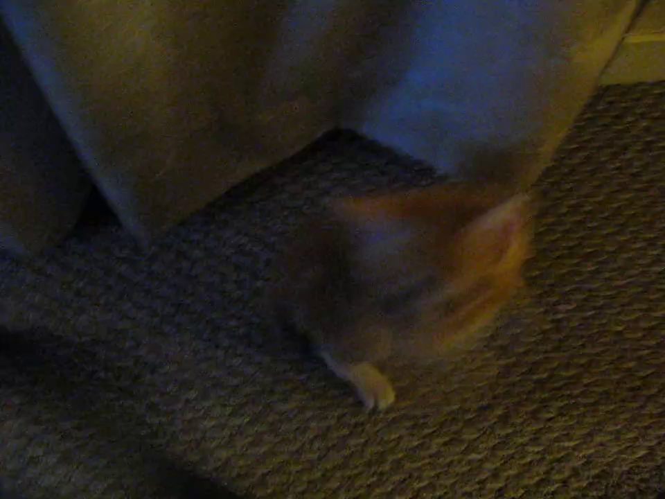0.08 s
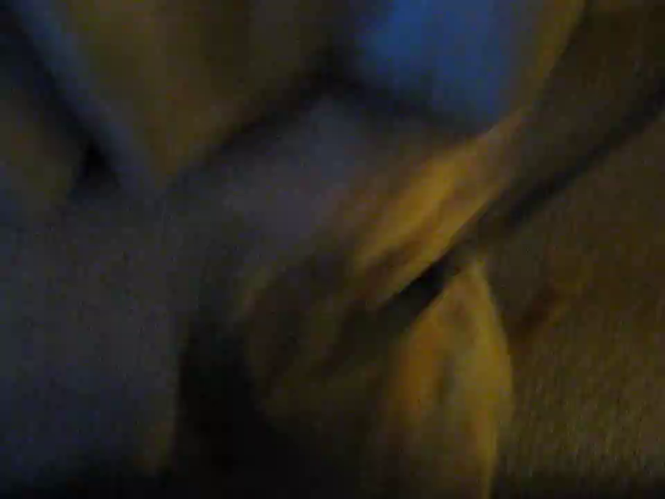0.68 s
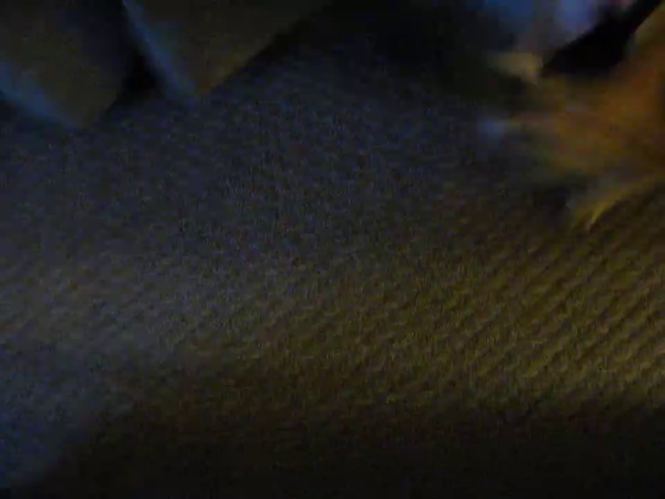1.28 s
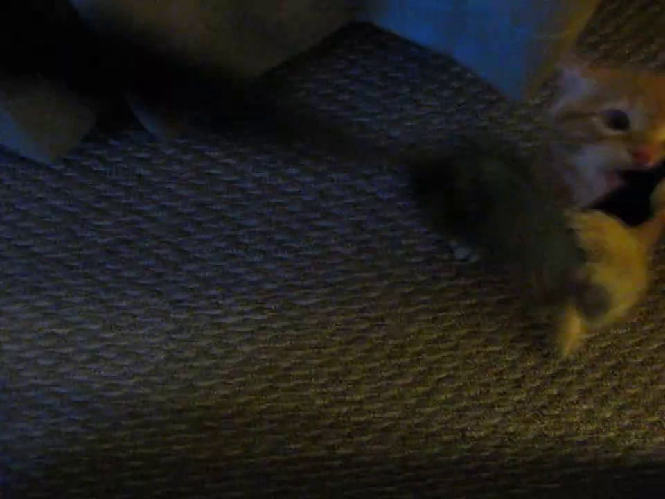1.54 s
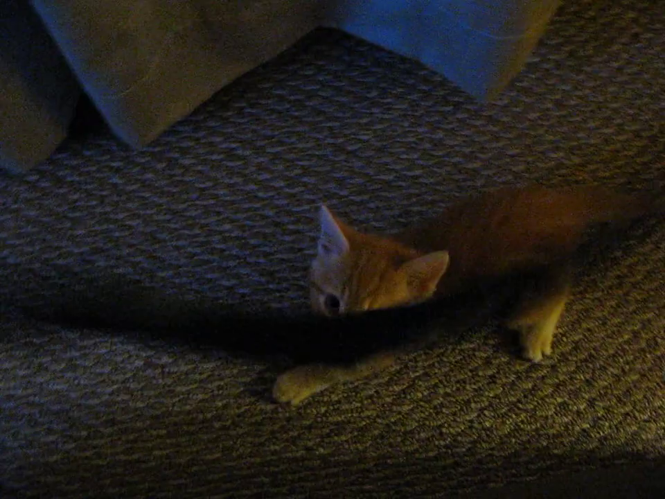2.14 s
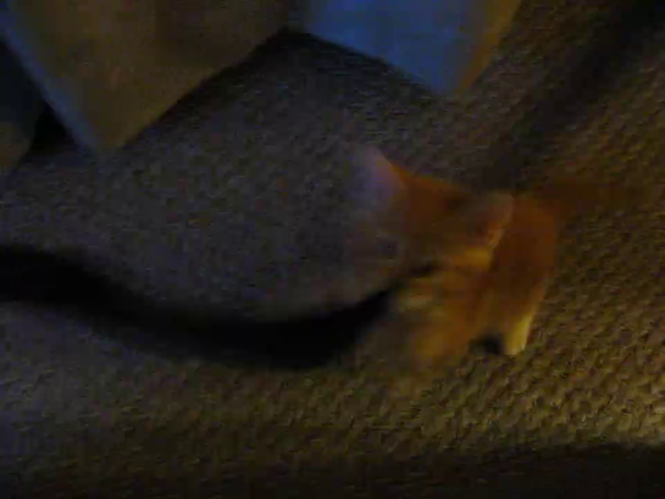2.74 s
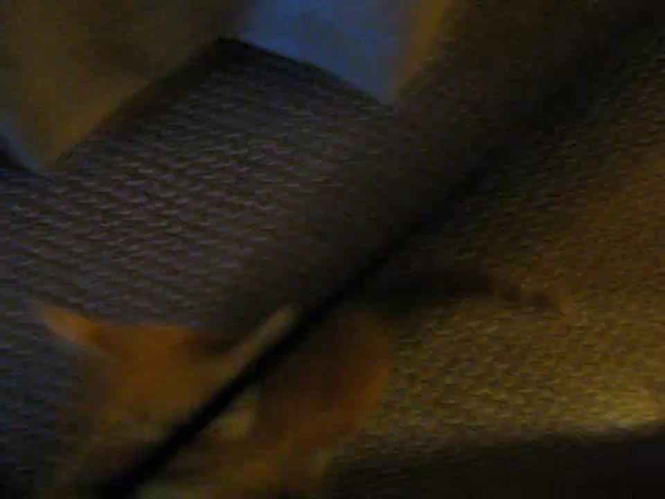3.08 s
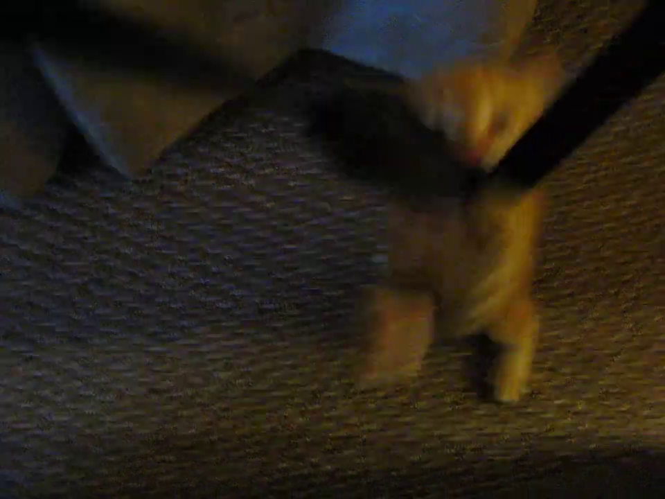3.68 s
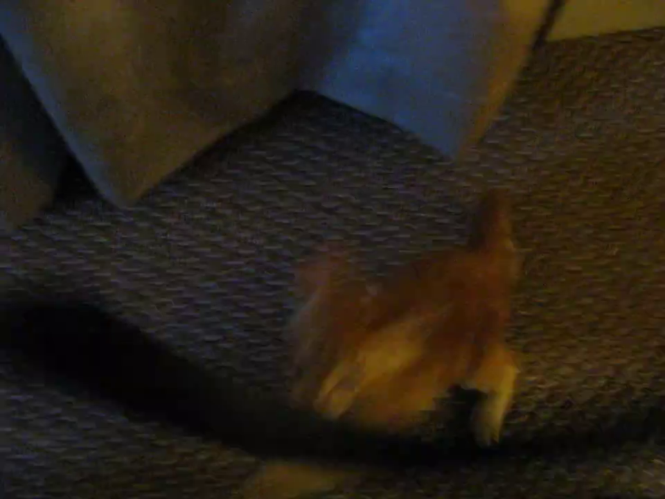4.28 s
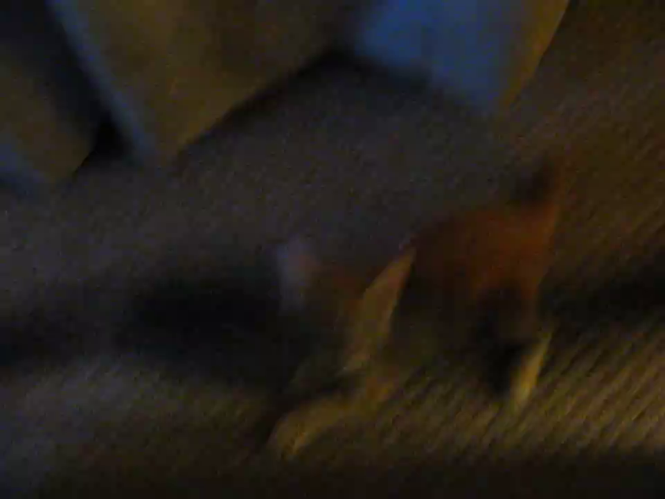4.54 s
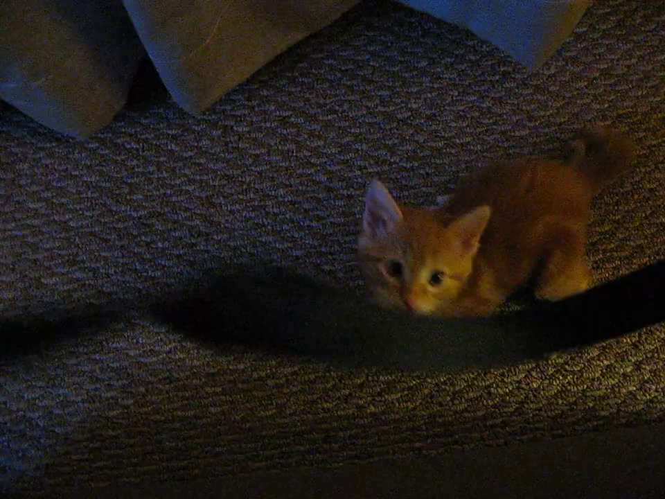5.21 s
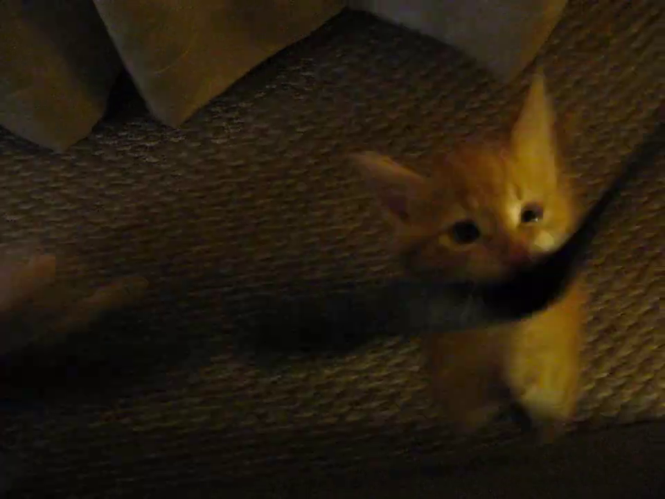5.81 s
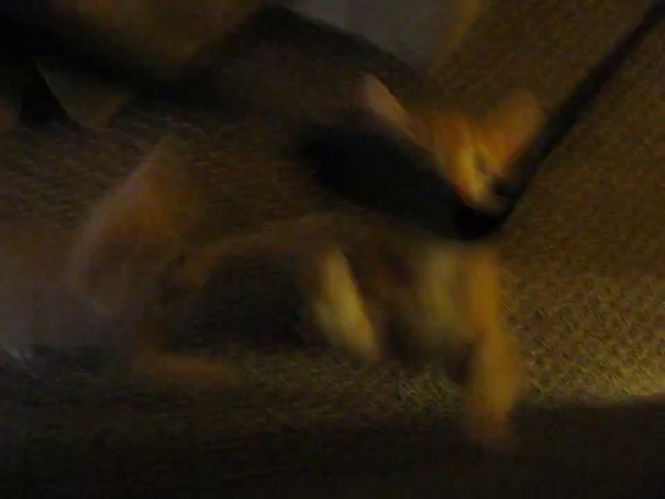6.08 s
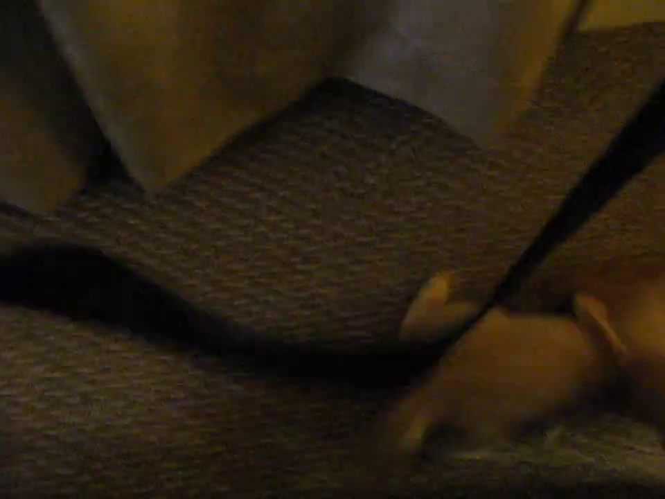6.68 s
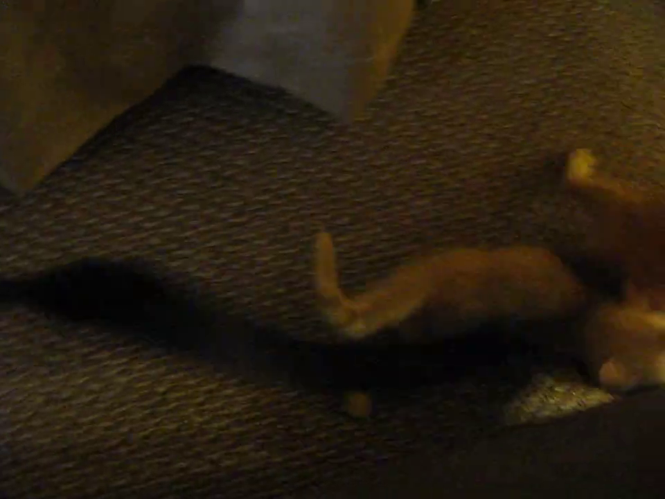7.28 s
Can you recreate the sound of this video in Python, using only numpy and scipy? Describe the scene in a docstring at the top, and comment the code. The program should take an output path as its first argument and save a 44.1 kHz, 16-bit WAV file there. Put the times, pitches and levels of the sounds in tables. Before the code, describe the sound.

A dangling strap clicks and scrapes against a camera as kitten paws thud on carpet in a quiet room.

```python
"""A faint hush and the thin hiss of a camera's focus drive, then the ticks and rubs of its dangling strap.
Kittens are pouncing on the strap in a quiet carpeted room. The fittings strike the camera's shell,
tugs jolt it, and the webbing rasps, swishes and squeaks by friction. Each landing excites the modes
of the wooden floor under the carpet, which knocks and booms. Close to the microphone,
a lens motor whirrs faintly in brief moves."""
import sys
import numpy as np
from scipy import signal
from scipy.fft import rfft, irfft
from scipy.io import wavfile

SR = 44100
rng = np.random.default_rng(int(sys.argv[2]) if len(sys.argv) > 2 else 0)


def transcribe(u):
    """Save the signal u as a 16-bit wav file named by the first command-line argument.

    u: samples, shape (n,) or (channels, n), limited to [-1, 1]; the rate is SR.
    q: integer samples, one column per channel.
    """
    v = np.clip(np.atleast_2d(u).T, -1, 1)
    q = np.round(v * 32767).astype(np.int16)
    wavfile.write(sys.argv[1], SR, q)


N = 328104
TIME = np.arange(N) / SR
AGE = np.arange(2 ** 15) / SR   # time since an impact

# the strap's edge dragging over the shell: middle t/s, length/s, level/dB
EDGE_DRAGS = [(0.326, 0.035, -40.5), (0.394, 0.038, -41), (0.44, 0.074, -45), (0.499, 0.047, -41),
              (0.676, 0.02, -45), (0.932, 0.02, -45.5), (1.107, 0.029, -46.5), (1.159, 0.014, -43.5),
              (1.234, 0.062, -40), (1.333, 0.014, -40), (2.901, 0.071, -50), (3.456, 0.16, -53.5),
              (5.767, 0.056, -43), (6.01, 0.031, -40.5), (6.262, 0.037, -42), (6.633, 0.042, -52.5)]


def from_db(db):
    """Amplitude grows tenfold for every 20 dB."""
    return 10 ** (np.asarray(db) / 20)


def rms_one(x):
    """Division by the root mean square gives unit power."""
    return x / np.sqrt(np.mean(x ** 2) + 1e-20)


def blow(x, db):
    """Scale an impact so that its energy, spread over 10 ms, has this level."""
    return from_db(db) * x * np.sqrt(.01 * SR / np.sum(x ** 2))


def add(out, t, x):
    """Superposition: x adds to out from time t."""
    at = max(0, round(t * SR))
    out[at:at + len(x)] += x[:len(out) - at]


def fade(t60):
    """Damping gives an exponential decay, 60 dB in t60 seconds."""
    return np.exp(-np.log(1000) * np.minimum(AGE / t60, 10))


def ring(hz, t60):
    """The impulse response of one mode is a damped sinusoid."""
    return np.sin(2 * np.pi * hz * AGE) * fade(t60)


def resonate(force, response):
    """Forced vibration: the force convolved with an impulse response, at unit power."""
    return rms_one(signal.oaconvolve(force, response)[:N])


def colour(x, spectrum):
    """A causal, minimum-phase filter shapes x to a spectrum of rows f/Hz, gain/dB."""
    hz, db = np.transpose(spectrum)
    size = 2 ** 12
    bin_hz = np.arange(size // 2 + 1) * SR / size
    gain = from_db(np.interp(np.log(bin_hz + 1), np.log(hz), db))
    cepstrum = irfft(np.log(gain)) * (1 + np.sign(size // 2 - np.arange(size)))
    cepstrum[0] /= 2
    return signal.oaconvolve(x, irfft(np.exp(rfft(cepstrum))))[:len(x)]


def drift(per_s):
    """Random fluctuation: straight lines between Gaussian values of spread 1."""
    knots = rng.standard_normal(2 ** 13)
    return np.interp(TIME * per_s, np.arange(len(knots)), knots)


def swell(t, length):
    """A flat-topped power envelope centred on t; length is its width at half power."""
    return 1 / (1 + (2 * (TIME - t) / length) ** 8)


def stroke_power(strokes, stretch):
    """Incoherent sounds add in power: the sum of strokes that each swell and fade."""
    return sum(swell(t, stretch * length) * from_db(db) ** 2 for t, length, db in strokes)


def contact(t60, grit):
    """A contact force is an impulse followed by a brief, dying scrape."""
    force = grit * rng.standard_normal(len(AGE)) * fade(t60)
    force[0] += 1
    return force[:2 ** 13]


def background(hush_db=-51.5, whine_db=-67.5):
    """Broadband noise of room and microphone is a hush; a narrow band of noise is a hoarse whine."""
    # spectrum of the hush: f/Hz, gain/dB
    hush_spectrum = [(25, -24.5), (70, 3), (150, -5), (260, 0), (380, -4.5), (560, -1.5), (900, -5),
                     (1800, -7.5), (2100, -4), (2400, -8), (6000, -13.5), (10000, -17), (16000, -23)]
    hush = rms_one(colour(rng.standard_normal(N), hush_spectrum))
    whine = resonate(rng.standard_normal(N), ring(hz=2105, t60=.09))
    return from_db(hush_db) * hush + from_db(whine_db) * whine


def focus_drive(steps_per_s=23.5, wander_cycles=.98, depth=.6, gain_db=1.5):
    """Amplitude modulation: the focus steps to and fro, breaking its thin hiss into quick puffs."""
    # course of the hiss: t/s, relative level/dB
    hiss_levels = [(0.0, -55.5), (0.41, -55), (0.74, -56.5), (1.04, -55.5), (2.42, -64.5), (2.8, -68),
                   (2.96, -55.5), (3.5, -51), (3.92, -57.5), (5.12, -71), (5.8, -54.5), (6.55, -52.5),
                   (7.04, -58.5), (7.44, -55)]
    # spectrum of the hiss: f/Hz, gain/dB
    hiss_spectrum = [(2500, -17), (4700, -14), (5400, 0), (6300, 0), (7100, -11), (8000, -6), (9300, -17),
                     (14500, -9)]
    cycles = steps_per_s * TIME + wander_cycles * drift(1.8)
    puffs = rms_one(1 + depth * np.tanh(2 * np.sin(2 * np.pi * cycles) + .5))
    hiss = rms_one(colour(rng.standard_normal(N), hiss_spectrum))
    level_db = np.interp(TIME, *np.transpose(hiss_levels)) + gain_db
    return from_db(level_db) * puffs * hiss


def footfalls(hind_hardness_db=-.5):
    """A pounce is two impacts, forepaws then soft hind paws; a step is one: t/s, level/dB, hardness/dB."""
    # pounces: t/s, level/dB, hardness/dB, hind delay/s, hind level/dB
    pounces = [(1.951, -21.5, 5, .047, -29.5), (3.02, -29.5, -1.5, 0.027, -23), (4.289, -26, 3, 0.05, -30),
               (5.994, -29.5, -4.5, 0.016, -43), (6.371, -15, 10, .035, -23.5)]
    # single paws: t/s, level/dB, hardness/dB
    steps = [(.002, -46, -10.5), (.633, -42, -12), (1.552, -37.5, -5.5), (2.924, -35, 13.5),
             (5.777, -30, 2), (6.121, -36.5, 4), (6.825, -37, 13.5), (7.053, -34.5, 14.5)]
    fore = [(t, db, hardness_db) for t, db, hardness_db, _, _ in pounces]
    hind = [(t + delay, db, hind_hardness_db) for t, _, _, delay, db in pounces]
    return fore + hind + steps


def paws(boom_db=1, knock_db=-.5, slap_db=-15, scatter_db=4, detune=.015):
    """Impact excites the modes of floor and boards and slaps the carpet; hard paws trade boom for slap."""
    # modes of the whole floor span: f/Hz, relative level/dB, t60/s
    floor_modes = [(83.5, -2, .31), (97, 2, .17), (122, -4, .11)]
    # modes of the boards under the paw: f/Hz, relative level/dB, t60/s
    board_modes = [(136.5, -7, 0.088), (199, -6.5, 0.054), (240.4, 2, 0.031), (298, 5, 0.038),
                   (344, -17, 0.31), (374.4, -3, 0.038), (451, -1, 0.039), (524, -18, 0.13)]
    # spectrum of a paw slapping carpet: f/Hz, gain/dB
    slap_spectrum = [(250, -22), (450, -11), (620, -6), (810, 2), (960, -3), (1250, -17), (2000, -31),
                     (7000, -62)]
    out = np.zeros(N)
    boom = sum(from_db(db) * ring(hz, t60) for hz, db, t60 in floor_modes) * (1 - fade(.04))
    for t, level_db, hardness_db in footfalls():
        spot = rng.standard_normal((len(board_modes), 2))   # every spot of the floor answers differently
        knock = sum(from_db(db + scatter_db * size) * ring(hz * (1 + detune * pitch), t60)
                    for (hz, db, t60), (size, pitch) in zip(board_modes, spot))
        knock *= 1 - fade(.012)   # the carpet cushions the start
        slap = colour(contact(t60=.016, grit=.12), slap_spectrum)
        add(out, t, from_db(level_db + boom_db - hardness_db) * boom)
        add(out, t, blow(knock, level_db + knock_db))
        add(out, t, blow(slap, level_db + slap_db + hardness_db))
    return out


def rattles(per_s=20, tries=4, centre_hz=3380, relative_db=-3, spread_db=2):
    """Small impacts fall at random within each drag: t/s, f/Hz, level/dB, sharpness/dB."""
    taps = []
    for t, length, drag_db in EDGE_DRAGS:
        chances, scatter = rng.random((tries, 2)), rng.standard_normal((tries, 3))
        for (luck, place), (pitch, size, sharp_db) in zip(chances, scatter):
            if luck < per_s * length / tries:
                hz = centre_hz * 2 ** (.25 * pitch)
                db = drag_db + relative_db - spread_db * size
                taps.append((t + length * (place - .5), hz, db, sharp_db))
    return taps


def fitting_ticks(ring_db=-1, thud_ref_db=-35.5, thud_ref_hz=3230, thud_db_per_octave=-24.5):
    """Hard impact: the fitting rings, the shell thuds, the contact cracks; sharp taps crack more."""
    # strap fittings tapping the camera: t/s, ring f/Hz, level/dB, sharpness/dB
    taps = [(0.226, 2080, -34.5, 5), (.251, 3000, -41.5, -3), (.3129, 3930, -26, 5.5),
            (0.3965, 2000, -41, 5.5), (.8316, 3530, -37, 5.5), (1.01, 2880, -44.5, 1),
            (1.1502, 4500, -47.5, -7.5), (1.2042, 3500, -39.5, 2), (1.2118, 2740, -42, -6),
            (1.2659, 3380, -37.5, 1.5), (1.423, 3200, -45, 2), (1.5053, 3400, -38.5, 6.5),
            (1.7715, 2870, -22, -5.5), (2.8967, 3530, -40, 1), (2.9233, 1680, -36, -2.5),
            (2.9632, 3820, -42.5, -7), (3.8232, 2800, -43, -3), (4.096, 3200, -36, -2),
            (4.1011, 3580, -33, 2.5), (4.4801, 2770, -48, 5.5), (5.505, 2920, -43, -3.5),
            (5.5362, 1900, -38, -3.5), (5.5452, 3430, -33.5, 2.5), (5.699, 2920, -29, 2.5),
            (5.7405, 3120, -41.5, 8), (6.1386, 3200, -52, 11.5)]
    # response of the shell: f/Hz, gain/dB
    shell_spectrum = [(60, 5.5), (300, 1), (900, 8), (2100, -1), (3200, -9.5)]
    # spectrum of the contact's crack: f/Hz, gain/dB
    crack_spectrum = [(2200, -8.5), (4300, 5.5), (5800, 6.5), (7800, 5.5), (9500, -3.5), (13000, -6),
                      (16000, -2)]
    out = np.zeros(N)
    for t, hz, db, sharp_db in taps + rattles():
        # heavier fittings ring lower and thud more
        thud_db = thud_ref_db + thud_db_per_octave * np.log2(hz / thud_ref_hz)
        thud = colour(contact(t60=.016, grit=1), shell_spectrum)
        ringing = ring(hz, .007) + .6 * ring(hz * 1.17, .004)
        crack = colour(contact(t60=.01, grit=1), crack_spectrum)
        add(out, t, blow(thud, min(thud_db, db + 2)))   # never far above the tap itself
        add(out, t, blow(ringing, db - sharp_db + ring_db))
        add(out, t, blow(crack, db + sharp_db))
    return out


def strap_jolts():
    """The strap snaps taut and passes an impulse to the camera, which bumps dully."""
    # tugs on the strap: t/s, level/dB
    tugs = [(0.254, -35.5), (4.116, -33), (5.658, -41), (6.246, -32), (6.271, -34)]
    # response of the jolted camera: f/Hz, gain/dB
    bump_spectrum = [(50, -8), (150, 2), (280, -0.5), (600, -9), (1500, -40), (6000, -55)]
    out = np.zeros(N)
    for t, db in tugs:
        bump = colour(contact(t60=.034, grit=.69), bump_spectrum)
        add(out, t, blow(bump, db))
    return out


def fibres(spectrum, per_s, spread_db, hiss):
    """Friction noise: woven fibres catch and let go in tiny, uneven slips over a smooth hiss."""
    slips = (rng.random(N) < per_s / SR) * rng.choice([-1, 1], N)
    sizes = from_db(spread_db * np.minimum(rng.exponential(1, N), 5))
    force = rms_one(slips * sizes) + hiss * rng.standard_normal(N)
    return rms_one(colour(force, spectrum))


def strap_rubbing(rasp_db=-.5, swish_db=.5, crackle_db=-15.5, uneven_db=5, slack_lengths=7):
    """Sliding friction rasps in the shell and swishes on its surface; the slack strap crackles."""
    # the strap's flat side sliding quickly past: middle t/s, length/s, level/dB
    slides = [(.445, 0.038, -38.5), (2.74, 0.049, -49), (2.9, 0.082, -51), (3.082, 0.049, -42),
              (3.48, 0.076, -54.5), (4.107, 0.01, -28.5), (4.5, 0.086, -52), (4.905, 0.034, -53),
              (5.7, 0.059, -35), (5.84, 0.16, -50.5), (7.34, 0.24, -47.5)]
    # spectrum of the rasp in the shell: f/Hz, gain/dB
    rasp_spectrum = [(60, -16), (500, -1), (1150, 2), (1900, -4), (3400, -3.5), (5500, -9), (8000, -19),
                     (16000, -36)]
    # spectrum of the swish on its surface: f/Hz, gain/dB
    swish_spectrum = [(1800, -21), (4000, -6.5), (7500, -2), (10000, -4), (13000, -5.5), (16000, -14.5)]
    # shares of power: a drag mostly rasps, a slide mostly swishes
    drag_swish, slide_rasp = from_db(-11) ** 2, from_db(-7.5) ** 2
    drag, slide = stroke_power(EDGE_DRAGS, stretch=1), stroke_power(slides, stretch=.98)
    rasp_power = drag + slide_rasp * slide
    swish_power = slide + drag_swish * drag
    slack_power = stroke_power(EDGE_DRAGS, slack_lengths) + slide_rasp * stroke_power(slides, slack_lengths)
    rasp = np.sqrt(rasp_power) * fibres(rasp_spectrum, per_s=2500, spread_db=.5, hiss=.49)
    swish = np.sqrt(swish_power) * fibres(swish_spectrum, per_s=8800, spread_db=2, hiss=.85)
    crackle = np.sqrt(slack_power) * fibres(rasp_spectrum, per_s=98, spread_db=3.5, hiss=.096)
    rubbing = from_db(rasp_db) * rasp + from_db(swish_db) * swish
    return rubbing * from_db(uneven_db * drift(110)) + from_db(crackle_db) * crackle


def strap_squeaks(length_s=.05, t60=.005):
    """Quick stick and slip gives a hoarse, narrow band of sound."""
    # webbing squeaking as it drags: middle t/s, f/Hz, level/dB
    squeaks = [(.54, 3500, -53), (.70, 2800, -51), (.81, 2900, -50), (5.765, 2660, -40.5)]
    slips = rng.standard_normal(N)
    return sum(from_db(db) * np.sqrt(swell(t, length_s)) * resonate(slips, ring(hz, t60))
               for t, hz, db in squeaks)


def lens_motor(gain_db=8, move_s=.021, whine_hz=1220, rise_hz=80, buzz_gain=1.15):
    """Pitch follows speed: the whine rises in each move, while the gears drive the barrel's modes."""
    # larger moves of the motor: middle t/s, relative level/dB
    whirrs = [(0.624, -49.5), (0.934, -49), (1.121, -52.5), (1.445, -50), (1.556, -47), (1.728, -54),
              (2.098, -53), (2.25, -55), (2.733, -50.5), (3.539, -52.5), (3.686, -50.5), (4.06, -53.5),
              (4.258, -49.5), (4.913, -51), (6.016, -43.5), (6.295, -51), (6.634, -51), (6.961, -52)]
    # resonances of the motor in the lens barrel: f/Hz, bandwidth/Hz, relative level/dB
    barrel_modes = [(500, 130, -4), (1180, 200, 0)]
    # the lens feels its way: a small move before and after each larger one
    nudges = [(t + side * rng.uniform(.03, .1), db + rng.normal(-7.5, 1.5))
              for t, db in whirrs for side in (-1, 1)]
    moves = whirrs + nudges
    barrel = sum(from_db(db) * np.sqrt(width) * ring(hz, t60=np.log(1000) / (np.pi * width))
                 for hz, width, db in barrel_modes)
    buzz = resonate(rng.standard_normal(N), barrel)
    progress = sum(swell(t, 2 * move_s) * (TIME - t) / move_s for t, _ in moves)
    pitch_hz = whine_hz + rise_hz * (progress + drift(150))
    whine = np.sqrt(2) * np.sin(2 * np.pi * np.cumsum(pitch_hz) / SR)
    power = sum(swell(t, move_s) * from_db(db) ** 2 for t, db in moves)
    return from_db(gain_db) * np.sqrt(power) * rms_one(whine + buzz_gain * buzz)


def room(x, t60):
    """Reverberation: diffuse reflections build up after the direct sound and decay exponentially."""
    # spectrum of the reflections: f/Hz, gain/dB
    echo_spectrum = [(90, -24), (250, 0), (3000, -2), (16000, -6)]
    reflections = rng.standard_normal(len(AGE)) * fade(t60) * (1 - fade(.012))
    tail = colour(reflections, echo_spectrum)
    return signal.oaconvolve(x, tail / np.sqrt(np.sum(tail ** 2)))[:N]


def scene(floor_echo_db=-16, strap_echo_db=-17):
    """Floor and strap, their reverberation, the lens and the background superpose in one channel."""
    bass_cut = signal.butter(4, 68, "high", fs=SR, output="sos")   # the landings carry little deep bass
    landings = signal.sosfilt(bass_cut, paws())
    lens_and_hush = lens_motor() + focus_drive() + background()
    strap = strap_rubbing() + strap_squeaks() + strap_jolts() + fitting_ticks()
    floor_echo = from_db(floor_echo_db) * room(landings, t60=.38)
    strap_echo = from_db(strap_echo_db) * room(strap, t60=.2)
    return (landings + strap + floor_echo + strap_echo + lens_and_hush)[None]


def record(dry):
    """Soft saturation rounds the peaks; a steep low-pass filter cuts the treble above 16 kHz."""
    low_pass = signal.ellip(10, .2, 70, 16000, fs=SR, output="sos")
    return signal.sosfilt(low_pass, np.tanh(dry))


dry = scene()
out = record(dry)
transcribe(out)
```